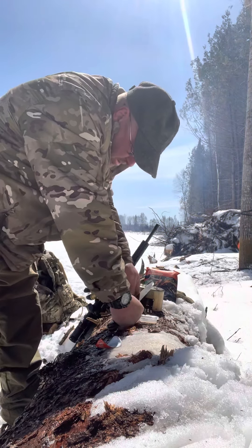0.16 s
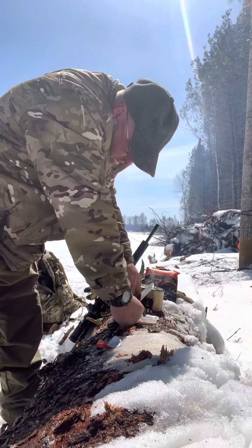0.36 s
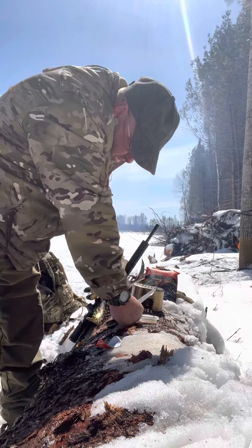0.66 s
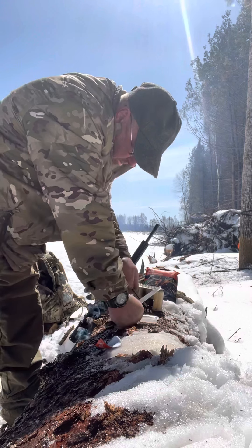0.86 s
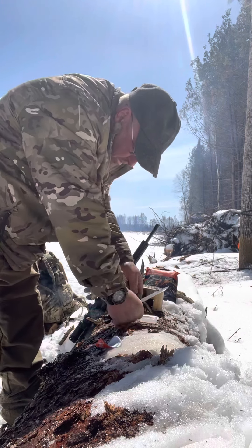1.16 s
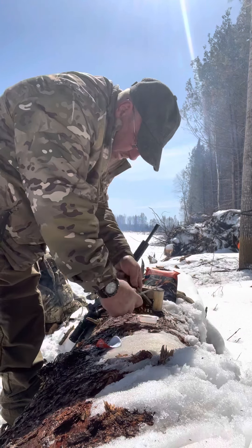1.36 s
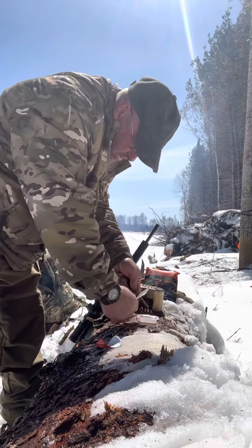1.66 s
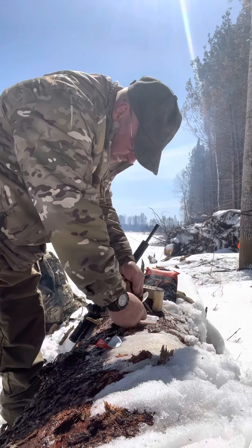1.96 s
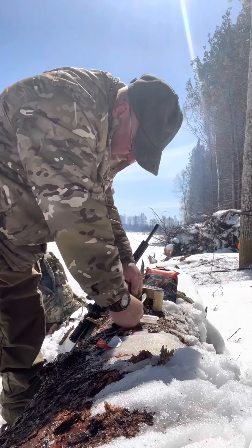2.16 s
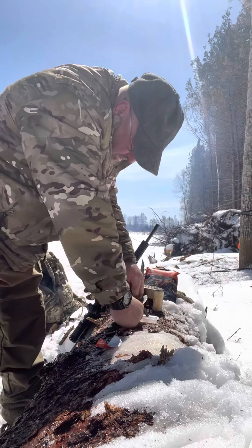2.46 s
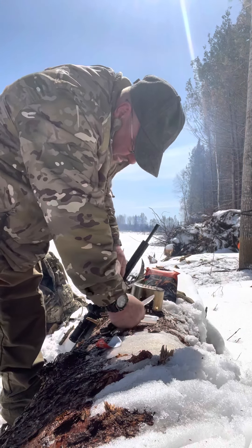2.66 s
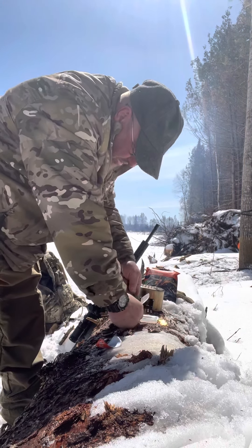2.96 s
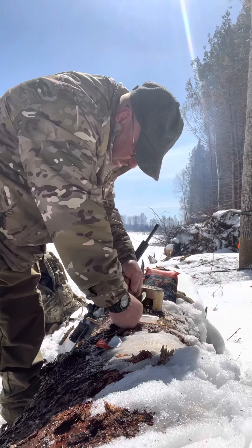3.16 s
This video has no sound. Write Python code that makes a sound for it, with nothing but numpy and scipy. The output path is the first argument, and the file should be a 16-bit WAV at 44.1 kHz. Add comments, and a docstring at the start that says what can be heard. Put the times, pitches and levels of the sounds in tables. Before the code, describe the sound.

Close up outdoors, a ferro rod is scraped with a brief ringing squeak and gritty rasp, clicks and taps follow, then a second scrape and longer rasp with soft thuds, faint tree reverberation behind.

```python
"""A steel striker scrapes along a ferro rod, close to a two-port microphone in a snowy clearing.
Twice a short ringing scrape ends in a squeak and a long rasp follows: torn chips and friction noise
sound through resonances, and the squeaks are decaying sines. Clicks, knocks and ticks are short coloured
bursts. Soft thuds fall on the log, sleeves rustle as grainy noise, a faint thin tone dies away,
low air rumbles, and the log, the body and the trees return diffuse noise tails."""
import sys
import numpy as np
from scipy.fft import rfft, irfft, next_fast_len
from scipy.io import wavfile
from scipy.ndimage import map_coordinates

SR = 44100
rng = np.random.default_rng(int(sys.argv[2]) if len(sys.argv) > 2 else 0)


def store_pcm(level_fs):
    """Save levels as 16-bit WAV."""
    pcm = np.round(np.clip(level_fs, -1, 1) * 32767).astype(np.int16)
    wavfile.write(sys.argv[1], SR, np.atleast_2d(pcm).T)


N = 145530
TIME = np.arange(N) / SR  # s
SIZE = next_fast_len(N + SR)  # room for one second of tail
FREQS = np.maximum(np.arange(SIZE // 2 + 1) * SR / SIZE, 1)  # Hz


def from_db(db):
    """Decibels to gain."""
    return 10 ** (np.asarray(db) / 20)


def rms_one(x):
    """Scale to unit power."""
    return x / np.sqrt(np.mean(x ** 2) + 1e-20)


def unit_energy(x):
    """Scale a burst to the energy of a unit click."""
    return x / np.sqrt(np.sum(x ** 2, axis=-1, keepdims=True) + 1e-20)


def at_hz(points, freqs=FREQS):
    """Read a spectrum on a log-frequency axis."""
    hz, value = np.transpose(points)
    return np.interp(np.log(freqs), np.log(hz), value)


def level(curve):
    """Gain along a level curve, down at -120 dB outside it."""
    s, db = np.transpose(curve)
    return from_db(np.interp(TIME, s, db, left=-120, right=-120))


def shape(x, response):
    """Filter by a frequency response."""
    return irfft(rfft(x, SIZE) * response, SIZE)[..., :N]


def causal(db):
    """Minimum-phase response with the given levels, so nothing sounds before its cause."""
    cepstrum = irfft(np.log(from_db(db)))
    half = len(cepstrum) // 2
    cepstrum[1:half] *= 2
    cepstrum[half + 1:] = 0
    return np.exp(rfft(cepstrum))


def slow(rate_hz):
    """A random wobble of unit spread, mostly slower than the given rate."""
    return rms_one(shape(rng.standard_normal(N), 1 / (1 + (FREQS / rate_hz) ** 2)))


def grains(rate, spread_db, smooth):
    """Random tiny fractures of uneven size over smooth friction noise."""
    sizes = from_db(spread_db * np.minimum(rng.exponential(1, N), 5))
    signs = rng.choice([-1, 1], N)
    struck = rng.random(N) < rate / SR
    chips = rms_one(sizes * signs * struck)
    smooth = np.clip(smooth, 0, 1)  # share of the power
    return np.sqrt(1 - smooth) * chips + np.sqrt(smooth) * rng.standard_normal(N)


# How the sound from the rod and from the log differs between the two microphone ports: # (frequency [Hz], left
# minus right level [dB], phase by which left leads [rad])
TO_MIC_FROM_ROD = [(100, 0, 0), (700, 0, .1), (1200, 5, -.1), (1700, 7.5, -.7), (2150, 4, -2),
                   (2600, 0, -3), (2950, 0, -3), (3250, 0, .3), (4400, -1, .1), (5200, -2, 1),
                   (6600, 0, 1.3), (8400, 0, 3.1), (10400, 0, 3.2), (12700, 0, 6.1), (14500, 0, 6.3)]
TO_MIC_FROM_LOG = [(100, .5, 0), (330, 3, 1), (700, 8, 2.2), (1300, 10, 2.5), (2000, 6, 3.2),
                   (2500, 0, 3.3), (3300, 9, 2.8), (4400, 9, 2.3), (5200, 1.5, 1.6), (6300, 0, 1.3),
                   (8600, 0, 2.9), (10500, 0, 4.1), (12700, 0, 5.7), (14500, 0, 6.4)]


def ports(x, table, lean=None):
    """Direct sound reaches the two ports with a level and phase that change with frequency."""
    table = np.array(table)
    balance_db = at_hz(table[:, [0, 1]]) + (at_hz(lean) if lean else 0)
    ratio = from_db(balance_db)
    lead = at_hz(table[:, [0, 2]])
    left_right = np.array([ratio, np.exp(-1j * lead)])
    return shape(x, left_right * np.sqrt(2 / (1 + ratio ** 2)))  # the summed power is kept


# Low rumble of the open air at the microphone: (time [s], level [dB])
AIR_LEVEL = [(0, -59), (.35, -62), (.55, -56), (1.08, -65), (1.22, -54.5), (1.45, -59.5), (1.8, -58.5),
             (1.95, -59.5), (2.07, -55.5), (2.14, -56.5), (2.22, -52), (2.42, -64), (2.6, -52), (2.8, -67),
             (3.15, -49), (3.3, -62)]
# Its colour: (frequency [Hz], relative level [dB])
AIR_COLOUR = [(20, -6.5), (35, -13.5), (55, 5.5), (75, 0.5), (120, -6), (200, -10), (400, -17), (1200, -28),
              (5000, -53)]


def air(width=0.3):
    """Low outdoor rumble: shaped noise, nearly the same at both ports."""
    mid, side = shape(rng.standard_normal((2, N)), from_db(at_hz(AIR_COLOUR)))
    return level(AIR_LEVEL) * rms_one(mid + width * side * np.array([[1], [-1]]))


def reflections(x, envelope, colour):
    """Diffuse returns: a noise tail under a decaying envelope, different at each port."""
    response = unit_energy(rng.standard_normal((2, SR)) * envelope[:SR])
    return shape(x, rfft(response, SIZE) * from_db(at_hz(colour)))


# Distant return from the trees: (frequency [Hz], relative level [dB])
TREE_COLOUR = [(100, -6.5), (700, 0.5), (1300, -6), (2500, -4), (4000, -5), (8000, -17), (16000, -34)]
ECHO_DB, ECHO_T60_S, ECHO_ONSET_S = -16, 0.38, 0.0017


def trees(x):
    """The tail swells quickly, then decays exponentially as the trees scatter the sound."""
    onset = 1 - np.exp(-TIME / ECHO_ONSET_S)
    decay = np.exp(-np.log(1000) * TIME / ECHO_T60_S)
    return from_db(ECHO_DB) * reflections(x, onset * decay, TREE_COLOUR)


# Close scatter from the log and the body: (frequency [Hz], level [dB])
SCATTER_COLOUR = [(100, -20), (300, -11), (700, -10), (3000, -12), (6500, -12), (9000, -24), (16000, -24)]
SCATTER_S = .002  # fall by a factor e


def scatter(x):
    """The log and the body return a very short tail, unrelated at the two ports."""
    return reflections(x, np.exp(-TIME / SCATTER_S), SCATTER_COLOUR)


# Faint thin tone near the rod: (time [s], level [dB])
WHISTLE_LEVEL = [(0, -72), (.06, -72.5), (.11, -91)]
WHISTLE_HZ, WHISTLE_WIDTH_HZ = 1684, 120


def whistle():
    """A faint thin tone, made of narrow-band noise, dies away."""
    offset = 2 * (FREQS - WHISTLE_HZ) / WHISTLE_WIDTH_HZ
    tone = shape(rng.standard_normal(N), 1 / (1 + offset ** 2))
    return level(WHISTLE_LEVEL) * rms_one(tone)


# Rustle of sleeves and tinder beside the rod: (time [s], level [dB])
RUSTLE_LEVEL = [(0, -69.5), (.17, -66), (.37, -72), (.9, -58), (1.0, -63.5), (1.12, -63), (1.28, -64),
                (1.48, -63.5), (1.56, -59.5), (1.68, -68), (1.725, -55.5), (1.79, -68.5), (1.89, -63),
                (1.97, -71), (2.25, -60), (2.33, -61.5), (2.42, -70.5), (3.3, -55)]
# Its colour: (frequency [Hz], relative level [dB])
CLOTH_COLOUR = [(100, 11), (350, 5.5), (700, 3.5), (1500, -2), (2600, -1), (4000, -4.5), (7000, -8.5),
                (10000, -9), (16000, -8)]
RUSTLE_GRAINS_PER_S, RUSTLE_SPREAD_DB, RUSTLE_SMOOTH = 260, 6.5, 0.67


def rustle():
    """Cloth and tinder give a faint hiss with tiny ticks."""
    cloth = grains(RUSTLE_GRAINS_PER_S, RUSTLE_SPREAD_DB, RUSTLE_SMOOTH)
    return level(RUSTLE_LEVEL) * rms_one(shape(cloth, causal(at_hz(CLOTH_COLOUR))))


# The hand bumps the log: (time [s], length [s], level [dB])
THUDS = [(2.574, 0.008, -43), (3.045, 0.0067, -47), (3.077, 0.011, -39.5), (3.101, 0.011, -42.5)]
# Their colour: (frequency [Hz], relative level [dB])
THUD_COLOUR = [(30, -16), (75, 8.5), (120, 2.5), (200, -9), (400, -21), (1500, -33)]


def bumps():
    """Soft dull thuds of the hand on the log: low noise under bell-shaped pushes."""
    push = sum(from_db(db) * np.exp(-.5 * ((TIME - s) / length) ** 2) for s, length, db in THUDS)
    return push * rms_one(shape(rng.standard_normal(N), from_db(at_hz(THUD_COLOUR))))


# Faint thin ticks of the tools in the hand: (time [s], relative level [dB])
TICKS = [(.066, -37), (.19, -33.5), (0.209, -38), (1.634, -31), (1.677, -34), (1.704, -27.5), (1.753, -35),
         (1.921, -34), (1.938, -33), (1.965, -26), (2.228, -31), (2.327, -25), (2.342, -28.5),
         (2.374, -31.5)]
# Their colour: (frequency [Hz], relative level [dB])
TICK_COLOUR = [(500, -45), (3000, -3), (7000, -2), (13000, -2.5), (16000, -9)]


def ticks():
    """Tiny bright taps of metal on metal: coloured single impulses."""
    out = np.zeros(N)
    for s, db in TICKS:
        out[int(s * SR)] += from_db(db)
    return shape(out, causal(at_hz(TICK_COLOUR)))


# Centres of the bands in which click levels are given: (frequency [Hz])
CLICK_BANDS_HZ = [180, 650, 1600, 3800, 11000]
# Resonances of the tools, raised or lowered at random in each click: (frequency [Hz])
CLICK_RING_HZ = [900, 1350, 1750, 2300, 3000, 3600, 4300, 5300, 6600, 8200, 10500, 12500, 14100]
# Corners below which the low notes of a click arrive late: (frequency [Hz])
BASS_LAG_HZ = [113, 260, 593]
CLICK_RING_DB, CLICK_RING_Q = 3, 16  # random spread and sharpness
GRAB_S, CRUMBLE_S, BODY_S = .0018, .0008, .005  # rise or fall by a factor e
GRAB_SHARE, BODY_SHARE = .2, .24  # amplitude beside the snap and crumble
CLICK_DB = -.5  # trim added to every band


def clicks(table, size=4096, count=512):
    """Each is a brief grating, a snap, a crumble and a short rattle, in its own colour."""
    out = np.zeros(N + size)
    age = (np.arange(size) - count) / SR  # zero at the snap
    freqs = np.maximum(np.arange(size // 2 + 1) * SR / size, 1)
    lag = np.prod([(hz - 1j * freqs) / (hz + 1j * freqs) for hz in BASS_LAG_HZ], axis=0)
    lag = lag / (1 + 60 / (1j * freqs))  # low cut at 60 Hz
    peaks = np.array([1 / (1 + (2 * CLICK_RING_Q * (freqs / hz - 1)) ** 2) for hz in CLICK_RING_HZ])
    for s, *band_db, crumbly in table:
        noise = rng.standard_normal((3, size))
        crumbly = np.clip(crumbly, 0, 1)
        crumble = unit_energy(noise[0] * np.exp(-abs(age) / CRUMBLE_S) * (age >= 0))
        rattle = unit_energy(noise[1] * np.exp(-abs(age) / BODY_S) * (age >= 0))
        grating = unit_energy(noise[2] * np.exp(-abs(age) / GRAB_S) * (age < 0))
        burst = np.sqrt(crumbly) * crumble + BODY_SHARE * rattle + GRAB_SHARE * grating
        burst[count] += np.sqrt(1 - crumbly)  # the snap
        ring_db = CLICK_RING_DB * rng.standard_normal(len(peaks)) @ peaks
        bands = list(zip(CLICK_BANDS_HZ, band_db))
        colour = causal(at_hz(bands, freqs) + ring_db + CLICK_DB)
        start = int(s * SR) - count
        out[start:start + size] += irfft(rfft(burst) * colour * lag)
    return out[:N]


# Clicks and knocks of striker, rod and bark, at the log:
# (time [s], relative level [dB] in each of the five click bands, crumbly share [0-1])
KNOCKS = [(.13, -18, -31, -29, -24, -28, .3), (.156, -25, -23, -22, -19, -31, .4),
          (.8132, -9, -9, -11, -14, -24, .35), (.8807, -22, -5, -8, -4, -11, .61),
          (.8829, -10, -14, -11, -7, -13, .28), (.8924, -15, -13, -10, -12, -21, .71),
          (.9046, -3, -2, -6, -5, -23, .28), (1.031, -16, -18, -14, -12, -22, .44),
          (1.0848, -18, -30, -24, -22, -28, .38), (1.1372, -27, -35, -32, -31, -26, .39),
          (1.1596, -23, -25, -24, -23, -15, .38), (1.292, -17, -14, -16, -17, -27, .35),
          (1.4092, -19, -34, -21, -18, -18, .11), (1.5127, 6, 7, 6, 2, 2, .08),
          (1.7177, -14, -19, -22, -24, -34, .22), (1.858, -10, -1, -2, -3, -14, .38),
          (1.9935, -3, 9, 2, 3, -18, .62), (1.996, 10, 6, -3, 3, -26, .27), (2.0311, 3, 7, 9, 12, -2, .12),
          (2.1671, -27, -32, -41, -32, -26, .2), (2.2118, -6, -2, -9, -12, -31, .5),
          (2.2664, -7, -9, -12, -16, -26, .61), (2.2945, -24, -15, -20, -22, -29, .48),
          (2.4799, -4, -1, -7, -14, -17, .6), (2.9617, -10, 4, 6, 8, -5, .15), (3.047, 3, 5, 0, 3, -7, .23),
          (3.1611, -4, 4, 8, 12, 3, .16), (3.2459, -3, -5, -11, -18, -20, .47),
          (3.2823, -25, -16, -22, -26, -31, .66)]


def knocks():
    """Striker, rod and bark touch with short hard contacts."""
    return clicks(KNOCKS)


# The edge snags, at the rod:
# (time [s], relative level [dB] in each of the five click bands, crumbly share [0-1])
SNAGS = [(.4435, -20, -14, -9, -9, -24, .7), (.6451, -5, 2, 10, -10, -25, .15),
         (.6625, -10, -10, -2, -4, -18, .6), (.7045, -20, -16, -10, -6, -14, .3),
         (.7477, -14, -16, -9, -11, -10, .46), (.7595, -16, -12, -7, -5, -18, .6),
         (1.8313, -19, -22, -3, -17, -32, .57), (2.537, -4, -1, -2, -8, -12, .49),
         (2.5558, -14, -3, -11, -4, -10, .3), (2.6808, -18, -13, -6, -10, -8, .23),
         (2.7652, -15, -12, -11, -7, -12, .64), (2.775, -16, -17, -13, -15, -15, .37),
         (2.7908, -14, -3, -2, -7, -12, .46), (2.8378, -28, -18, -15, -17, -19, .21),
         (2.8479, -13, -11, -4, -5, -7, .19), (3.0923, -14, -5, -1, -6, -19, .52),
         (3.1004, -4, -4, -4, -13, -17, .43), (3.1948, -23, -14, -11, -19, -26, .5)]


def snags():
    """The striker's edge snags on the rod with a click."""
    return clicks(SNAGS)


# The striker catches on the rod, one row per ringing mode:
# (time [s], build-up [s], pitch [Hz], level [dB], time to fall 60 dB [s])
CATCHES = [(0.448, .002, 1160, -35.5, 0.019), (0.5104, 0.00094, 1290, -26, 0.012),
           (0.5098, 0.0012, 1744, -27.5, 0.037), (.5095, 0.0014, 5860, -22.5, 0.0099),
           (2.518, 0.0012, 980, -36.5, 0.019), (2.5643, 0.0016, 1957, -21.5, 0.026),
           (2.5642, 0.00086, 1000, -25, 0.012), (2.5645, 0.00091, 3270, -41.5, .014),
           (2.5635, .001, 4680, -34, .011), (2.5642, .002, 5800, -36, .014),
           (2.563, .001, 10640, -23, .008)]


def squeaks():
    """A catch builds up modes of the striker, which then ring out."""
    out = np.zeros(N)
    for s, build_up, hz, db, t60 in CATCHES:
        age = np.maximum(TIME - s, 0)
        rise = np.minimum(age / build_up, 1)
        fall_db = np.maximum(-60 * np.maximum(age - build_up, 0) / t60, -200)
        out += rise * from_db(db + fall_db) * np.sin(2 * np.pi * hz * age)
    return out


# Centres of the registers of the chips: (frequency [Hz])
CHIP_BANDS_HZ = [700, 1600, 3600, 5400, 8500, 14000]
# Part of a stroke that is unrelated at the two ports: (frequency [Hz], relative level [dB])
DIFFUSE = [(100, -11), (1500, -9), (3200, -5), (5500, -6), (7400, -5), (8700, -19), (10200, -18),
           (11400, -4), (13000, -16), (16000, -14)]
CHIPS_PER_S, CHIP_SPREAD_DB, FRICTION_SHARE = 900, 2.8, .35  # in each register
JUDDER_HZ, JUDDER_DB = 130, 2
GRIP_WANDER, GRIP_WANDER_HZ = .009, 12  # spread of playing speed as a share, and its rate


def stroke(pressure, colour, grip, lean):
    """The juddering edge tears off chips, heard through resonances that wander with the grip."""
    chips = np.zeros(N)
    for share in np.eye(len(CHIP_BANDS_HZ)):
        register = np.sqrt(at_hz(list(zip(CHIP_BANDS_HZ, share))))
        chips += shape(grains(CHIPS_PER_S, CHIP_SPREAD_DB, FRICTION_SHARE), register)
    diffuse_gain = from_db(at_hz(DIFFUSE))
    diffuse = shape(rng.standard_normal((2, N)), diffuse_gain)
    lift_db = sum(db / (1 + (2 * (FREQS - hz) / width) ** 2) for hz, width, db in grip)
    body = causal(at_hz(colour) + lift_db) / np.sqrt(1 + diffuse_gain ** 2)
    judder = from_db(JUDDER_DB * slow(JUDDER_HZ))
    rasp = shape((ports(chips, TO_MIC_FROM_ROD, lean) + diffuse) * judder, body)
    # reading at an uneven speed makes the resonances wander in pitch
    place = np.arange(N) + np.cumsum(GRIP_WANDER * slow(GRIP_WANDER_HZ))
    wandering = [map_coordinates(side, [place], order=5, mode="mirror") for side in rasp]
    return level(pressure) * rms_one(np.array(wandering))


# Pressure of each stroke at the rod, as the level of its rasp: (time [s], level [dB])
SCRAPE_1_PRESSURE = [(.408, -69), (.426, -48.5), (.445, -37.5), (.47, -43), (.518, -38), (.532, -51.5),
                     (.585, -61)]
RASP_1_PRESSURE = [(.58, -58), (.596, -45), (.622, -44), (.631, -37), (.685, -37), (.725, -42), (.765, -37),
                   (.80, -52), (.865, -60)]
SCRAPE_2_PRESSURE = [(2.48, -49), (2.501, -63), (2.51, -38.5), (2.568, -38.5), (2.583, -65), (2.635, -57)]
RASP_2_PRESSURE = [(2.635, -71), (2.664, -39.5), (2.69, -55.5), (2.703, -40), (2.745, -46), (2.785, -40.5),
                   (2.82, -47), (2.89, -40), (2.94, -42.5), (2.985, -42.5), (3.03, -43.5), (3.095, -38),
                   (3.115, -51.5), (3.15, -54), (3.205, -52.5), (3.3, -63)]
# Colour of each stroke: (frequency [Hz], relative level [dB])
SCRAPE_1_COLOUR = [(150, -7), (700, -9), (1300, -4), (1900, -3), (2600, -12), (3500, -7), (6000, -6),
                   (7000, -10), (8500, -5), (10000, -8), (13000, -7), (16000, -10)]
RASP_1_COLOUR = [(100, -9), (280, 0), (800, 0), (1900, 1), (2450, -9), (3900, 1), (5400, 0), (6600, -4),
                 (8500, -5), (10000, -9), (12000, -6), (16000, -6)]
SCRAPE_2_COLOUR = [(150, -3), (500, -3), (1500, -2), (2300, -1), (2850, -10), (3400, -3), (6500, -1),
                   (9000, -4), (11400, -9), (13000, -6), (16000, -7)]
RASP_2_COLOUR = [(100, -4), (350, -4), (900, -1), (2000, -4), (2500, -3), (2950, -14), (3400, -1),
                 (4600, -1), (5200, -5), (6300, -1), (9400, -2), (10500, -8), (12500, -5), (16000, -8)]
# Resonances of the striker, which shift with the grip: (frequency [Hz], width [Hz], lift [dB])
SCRAPE_1_GRIP = [(1080, 200, 7), (1690, 260, 10), (3600, 220, 6), (5050, 320, 7), (8300, 450, 5),
                 (9250, 400, 9), (12300, 300, 6), (14120, 380, 15)]
SCRAPE_2_GRIP = [(980, 200, 7), (2090, 170, 13), (4010, 260, 9), (6680, 280, 8), (7400, 250, 4),
                 (10300, 300, 4), (12530, 340, 13), (14100, 400, 10)]
RASP_GRIP = [(1560, 380, 8), (3550, 350, 3), (4200, 400, 2), (5550, 400, 3), (8250, 450, 3)]
# Added balance at the microphone as the rod is angled: (frequency [Hz], left minus right level [dB])
LEAN_1 = [(300, 0), (700, 3), (2600, 0), (3300, -3), (4700, -6.5), (6000, 0)]
LEAN_2 = [(200, 0), (600, -4.5), (1500, -1), (2800, 0), (3400, 2.5), (4400, 3), (6000, 0)]


def strokes():
    """Twice the striker gives a short scrape, then a long rasp along the rod."""
    return (stroke(SCRAPE_1_PRESSURE, SCRAPE_1_COLOUR, SCRAPE_1_GRIP, LEAN_2)
            + stroke(RASP_1_PRESSURE, RASP_1_COLOUR, RASP_GRIP, LEAN_1)
            + stroke(SCRAPE_2_PRESSURE, SCRAPE_2_COLOUR, SCRAPE_2_GRIP, None)
            + stroke(RASP_2_PRESSURE, RASP_2_COLOUR, RASP_GRIP, LEAN_2))


def scene():
    """The air, the sounds at the log and at the rod, their near and far returns, and the strokes."""
    at_log = bumps() + ticks() + knocks()
    at_rod = whistle() + rustle() + snags() + squeaks()
    scraping = strokes()
    near = scatter(at_rod + at_log)
    far = trees(scraping[0] + at_rod + at_log)  # the left port's strokes feed the tail
    direct = ports(at_log, TO_MIC_FROM_LOG) + ports(at_rod, TO_MIC_FROM_ROD) + scraping
    return air() + far + near + direct


CUTOFF_HZ = 15850


def record(dry):
    """The microphone's top is cut steeply."""
    return shape(dry, 1 / np.sqrt(1 + (FREQS / CUTOFF_HZ) ** 160))


dry = scene()
out = record(dry)
store_pcm(out)
```